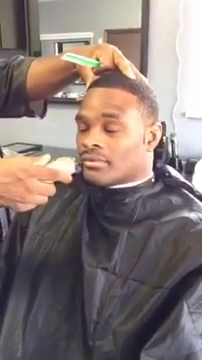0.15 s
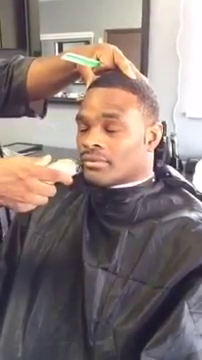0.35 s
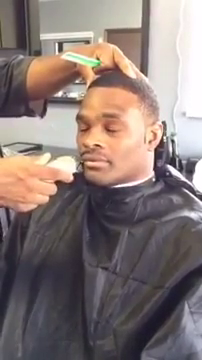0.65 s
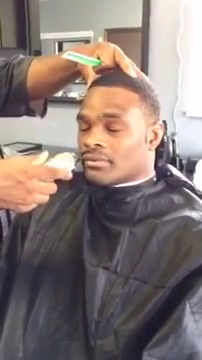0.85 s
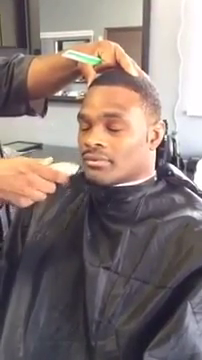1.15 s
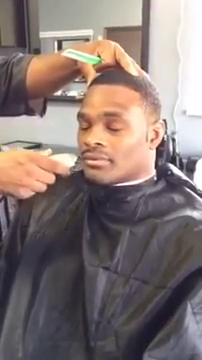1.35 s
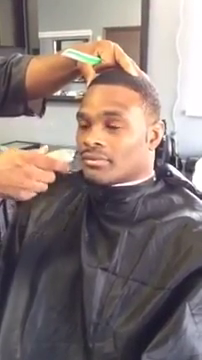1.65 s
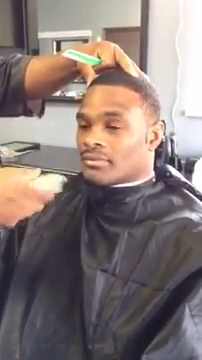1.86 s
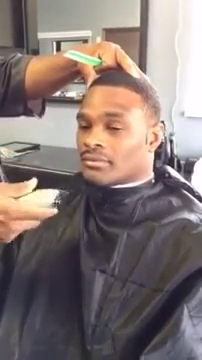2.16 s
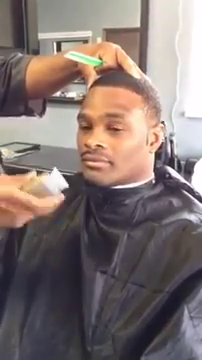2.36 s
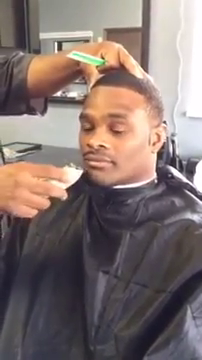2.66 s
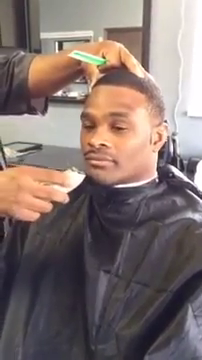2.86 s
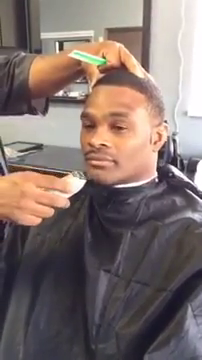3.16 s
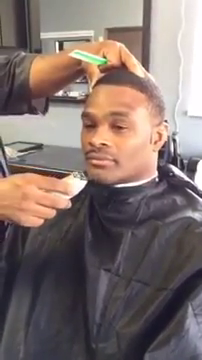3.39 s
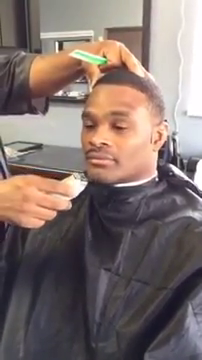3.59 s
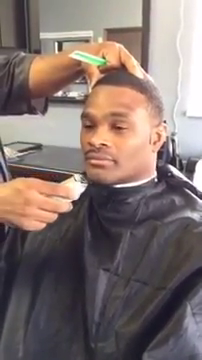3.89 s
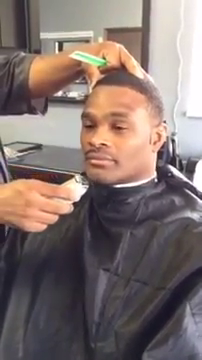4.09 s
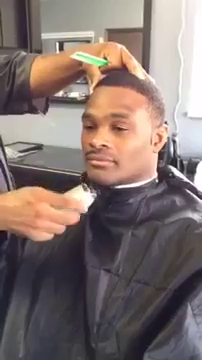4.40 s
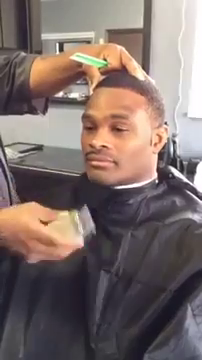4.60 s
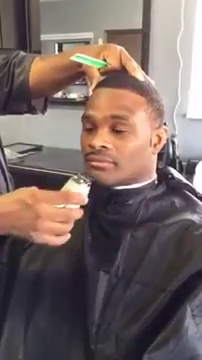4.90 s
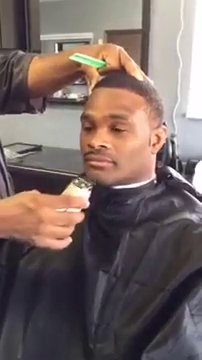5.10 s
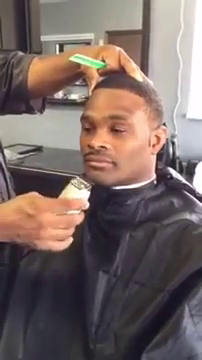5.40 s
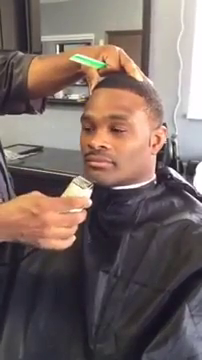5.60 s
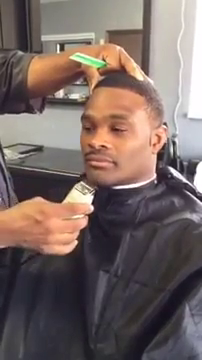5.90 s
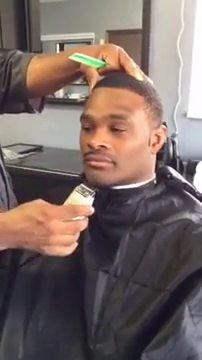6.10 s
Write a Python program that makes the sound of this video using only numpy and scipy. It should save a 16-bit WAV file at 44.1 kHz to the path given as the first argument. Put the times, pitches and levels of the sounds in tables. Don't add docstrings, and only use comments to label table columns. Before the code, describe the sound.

In a quiet barbershop with faint rumbling ventilation, mains-powered hair clippers buzz continuously for about 6.25 seconds, heard by a phone a few steps away with dull upper treble. The pitch stays fixed, a low hum under a nasal, rattling buzz and fine blade hiss, while tone and loudness shift as the hand turns. Soft crunching passes come around 0.2, 0.5, 0.8 and 1.3 to 1.7 seconds. At 1.77 a short rasp with a hard housing knock cleans the blades, followed by muffled bumps until 2.05. The buzz brightens; at 2.42 a lever snaps sharply, trailed by tiny ticks. Crunching resumes at 3.0 and thickens from 3.5, with raspy knocks at 3.85 and 4.27 and a strong crackle at 4.5. The buzz then carries on steadily, with crackling bites near 5.3 to 5.4 and crunching from 5.8 to 6.1, before a last knock at 6.2.

```python
import sys
import numpy as np
from scipy import signal
from scipy.fft import rfft, irfft
from scipy.io import wavfile
from scipy.ndimage import uniform_filter1d

SR = 44100
rng = np.random.default_rng(int(sys.argv[2]) if len(sys.argv) > 2 else 0)


def voltage_ratio(level):
    return 10 ** (np.asarray(level, float) / 20)


def bounce(signal):
    frames = np.transpose(np.atleast_2d(signal))
    limited = np.clip(frames, -1, 1)
    pcm = np.round(limited * 32767).astype(np.int16)
    wavfile.write(sys.argv[1], SR, pcm)


N = 275625
T = np.arange(N) / SR
SLOW = np.arange(N * 100 // SR + 2) / 100
MAINS_HZ = 59.98


def evened(x):
    return x / np.sqrt(np.mean(x ** 2) + 1e-20)


def add(mix, s, sound):
    part = mix[round(s * SR):][:len(sound)]
    part += sound[:len(part)]


def smoothed(x, bands, frames):
    return uniform_filter1d(uniform_filter1d(x, size=bands, axis=-2), size=frames, axis=-1)


def coloured(x, points):
    hz, db = np.transpose(points)
    f = np.fft.rfftfreq(len(x), 1 / SR)
    gain = voltage_ratio(np.interp(np.log(f + 1), np.log(hz), db))
    return evened(irfft(rfft(x) * gain, len(x)))


def body(x, peaks):
    out = np.zeros(len(x))
    for k, (hz, width, db) in enumerate(peaks):
        b, a = signal.iirpeak(hz, hz / width, SR)
        steep = signal.lfilter(b, a, signal.lfilter(b, a, x))
        out += (-1) ** k * voltage_ratio(db) * steep
    return evened(out)


def ring(modes, pitch):
    t = T[:SR // 10]
    out = np.zeros(len(t))
    for (hz, db, t60), (a, b) in zip(modes, rng.random((len(modes), 2))):
        mode_hz = hz * pitch * (0.967 + 0.058 * b)
        out += voltage_ratio(db + 2.1 * a - 60 * t / t60) * np.sin(2 * np.pi * mode_hz * t)
    out = out * np.minimum(t / 0.0003, 1)
    return out / abs(out).max()


def wander(size, hz):
    pole = np.exp(-2 * np.pi * hz / 100)
    rough = signal.lfilter([1], [1, -pole], rng.standard_normal((size, len(SLOW))))
    return evened(uniform_filter1d(rough, size=4))


def held(t, start, end, rise, fade):
    return np.minimum(rise * (t - start), 0) - fade * np.maximum(t - end, 0)


def strokes(count, sharp, uneven_db):
    turns = T * MAINS_HZ * count
    chance = np.clip(rng.standard_normal(int(turns[-1]) + 1), -3, 2)
    size = voltage_ratio(uneven_db * chance)
    return size[turns.astype(int)] * np.exp(-sharp * (turns % 1))


# (frequency [Hz], density [dB per Hz])
AIR_SPECTRUM = [(20, -40), (50, -17.5), (75, -16), (96, 3), (112, -6), (160, -14), (250, -18), (420, -28),
                (700, -24), (1000, -21), (1500, -34.5), (2500, -25), (5000, -42.5), (8500, -34.5)]


def air():
    swell_db = 0.8 * np.interp(T, SLOW, wander(size=1, hz=3)[0])
    return voltage_ratio(-51 + swell_db) * coloured(rng.standard_normal(N), AIR_SPECTRUM)


def room(x):
    level_db, t60_s, taps_per_s = -9, 0.62, 2000
    t = T[:SR // 2]
    taps = rng.choice([-1., 1.], len(t)) * (rng.random(len(t)) < taps_per_s / SR)
    taps = taps * voltage_ratio(-60 * t / t60_s) * (t > 0.004)
    taps = signal.lfilter([1], [1, -0.4], taps)
    return voltage_ratio(level_db) * signal.fftconvolve(x, taps / np.linalg.norm(taps))[:N]


# (time [s], level [dB], frequency [Hz])
THUMP_EVENTS = [
    (1.899, -39, 314),
    (1.948, -40, 130.6),
    (2.021, -41, 123.5),
    (4.941, -51, 377),
]


def thumps():
    out = np.zeros(N)
    for s, db, hz in THUMP_EVENTS:
        size = round(5 * SR / hz)
        add(out, s, voltage_ratio(db) * np.sin(2 * np.pi * hz * T[:size]) * np.hanning(size))
    return out


# (time [s], peak level [dB], pitch factor [1])
TICK_EVENTS = [
    (2.4236, -17, 0.94),
    (2.4949, -33.5, 0.99),
    (2.5363, -29.5, 0.94),
    (2.5463, -30, 0.73),
    (3.655, -29, 0.83),
]
# (delay [s], level [dB])
REBOUNDS = [
    (0, 1),
    (.0018, -7),
    (.0045, -15),
    (.008, -9),
    (0.012, -10),
]
# (frequency [Hz], level [dB], decay time T60 [s])
LEVER_MODES = [(3370, -6.5, 0.028), (3880, -14.5, 0.0033), (5000, 8, 0.0048), (5100, -11, 0.0089),
               (5840, 13, 0.0043), (6570, 6, 0.0083), (6960, 5.5, 0.0044), (7390, -1, 0.009),
               (7800, -21, 0.0038)]


def ticks():
    out = np.zeros(N)
    for s, db, pitch in TICK_EVENTS:
        for late, less_db in REBOUNDS:
            add(out, s + late, voltage_ratio(db + less_db) * ring(LEVER_MODES, pitch))
    return out


# (time of the knock [s], rasp level [dB], knock level [dB])
FLICK_EVENTS = [
    (1.765, -31, -17),
    (3.849, -31, -15.5),
    (4.272, -32, -16.5),
    (6.213, -30, -16),
]
# (delay [s], level [dB])
KNOCK_BLOWS = [
    (-.012, -6),
    (.0005, 0),
    (.005, -1.5),
    (0.011, -20),
]
# (frequency [Hz], density [dB per Hz])
RASP_SPECTRUM = [(120, -55), (200, -23.5), (438, -14.5), (505, -19), (712, 0.5), (901, -8.5), (2070, -1.5),
                 (2580, -8.5), (6820, -15.5), (8490, -22.5), (11000, -49.5), (18700, -120)]
# (frequency [Hz], level [dB], decay time T60 [s])
HOUSING_MODES = [(414, -33.5, 0.097), (781, -7.5, 0.12), (1226, 4.5, 0.081), (1556, 7, 0.04),
                 (2040, -8, 0.011), (3347, 10.5, 0.01), (4500, -11, 0.0068), (5790, 12.5, 0.0038),
                 (6700, -18, 0.0032)]


def flicks():
    out = np.zeros(N)
    grain_db = 2.8 * np.minimum(rng.exponential(1, N), 4)
    grit = coloured(rng.standard_normal(N) * voltage_ratio(grain_db), RASP_SPECTRUM)
    for s, rasp_db, knock_db in FLICK_EVENTS:
        slide = voltage_ratio(-5.5 + held(T - s, start=-0.028, end=0.059, rise=349, fade=231))
        jolt = voltage_ratio(1 + held(T - s, start=0, end=0.009, rise=6000, fade=500))
        out += voltage_ratio(rasp_db) * np.hypot(slide, jolt) * grit
        for late, db in KNOCK_BLOWS:
            add(out, s + late, voltage_ratio(knock_db + db) * ring(HOUSING_MODES, 1))
    return out


# (time [s], peak level [dB])
TUFT_EVENTS = [(0.5317, -31), (0.8387, -29.5), (1.4724, -27.5), (3.12, -34), (3.6122, -42), (3.641, -27),
               (3.654, -23.5), (3.7163, -30), (4.093, -23.5), (4.163, -29), (4.1863, -33), (4.4692, -39),
               (4.5128, -20), (5.286, -25), (5.3109, -25.5), (5.3852, -30), (5.396, -32), (5.412, -22),
               (5.419, -35.5), (5.9946, -31), (6.1117, -29)]
# (frequency [Hz], level [dB], decay time T60 [s])
PLATE_MODES = [(1300, -11, 0.013), (1620, -1, 0.03), (1736, 4.5, 0.033), (1874, -2.5, 0.02),
               (3320, -15.5, 0.0083), (6600, -25.5, .006)]


def tufts():
    out = np.zeros(N)
    bite = np.minimum(T[:SR // 10] / 0.002, 1)
    for s, db in TUFT_EVENTS:
        add(out, s, voltage_ratio(db + 3.0) * ring(PLATE_MODES, 1) * bite)
    return out


# (start [s], length [s], crunch level [dB], chatter over crunch [dB])
HAIR_PASSES = [(-.03, .1, -53.5, -17), (0.194, 0.16, -45.5, -15.5), (0.472, 0.1, -48, -16.5),
               (0.78, 0.13, -47.5, -16), (1.327, 0.36, -48, -15), (1.908, 0.13, -48, -15),
               (2.078, 0.42, -57, -4), (2.43, 0.13, -69, 2), (3.03, 0.35, -45, -10),
               (3.473, 0.11, -46.5, -5.5), (3.574, 0.18, -42.5, -10), (3.978, 0.29, -44, -6.5),
               (4.116, 0.36, -41, -6.5), (4.457, 0.12, -40.5, -4), (4.65, 0.13, -58.5, 4),
               (5.505, 0.39, -66.5, 5), (5.228, 0.17, -45.5, -8), (5.79, 0.2, -41.5, -13.5),
               (5.998, 0.095, -41, -15)]


def cutting(idle_db, bright):
    bite_s, leave_db_per_s = 0.036, 149.5
    power = voltage_ratio(2 * idle_db)
    for s, length, db, over_db in HAIR_PASSES:
        shape_db = held(T, s + bite_s, s + length, 20 / bite_s, leave_db_per_s)
        power = power + voltage_ratio(2 * (db + bright * over_db + shape_db))
    return np.sqrt(power)


# (frequency [Hz], width [Hz], level [dB])
CRUNCH_PEAKS = [(1258, 306, -11.5), (1600, 212, -2.5), (1897, 654, -8.5), (769, 227, -12), (3350, 520, -20),
                (6770, 540, -26)]


def crunch():
    snaps = rng.standard_normal(N) * (rng.random(N) < 9000 / SR)
    bunches = 0.2 + strokes(count=2, sharp=1.5, uneven_db=4.5)
    return cutting(idle_db=-62.5, bright=0) * body(snaps * bunches, CRUNCH_PEAKS)


# (frequency [Hz], width [Hz], level [dB])
CHATTER_PEAKS = [(2810, 460, -7), (3600, 980, 0), (4220, 780, -1.5), (5780, 3500, -7), (6950, 1500, 0),
                 (7960, 2700, -9)]


def chatter():
    puffs = 0.34 + strokes(count=4, sharp=2.1, uneven_db=1.5)
    drive = rng.standard_normal(N) * puffs
    return cutting(idle_db=-70, bright=0.88) * body(drive, CHATTER_PEAKS)


# (time [s], place, 0 cheek, 1 jaw, 2 under the jaw, 3 chin [1])
PLACE_PATH = [
    (0, 0),
    (1.65, -0.5),
    (2.1, 0.9),
    (2.55, 0.5),
    (3.0, 1),
    (3.12, 1.5),
    (4.55, 2.5),
    (4.85, 3),
    (6.25, 3),
]


def place_at(t):
    return np.interp(t, *np.transpose(PLACE_PATH))


# (frequency [Hz], width [Hz], level [dB])
TOOTH_PEAKS = [(2566, 470, 0.5), (3395, 670, -1.5), (3760, 570, -3), (4100, 830, -1.5), (5250, 880, -9.5),
               (6290, 690, -4), (7550, 1600, -8.5)]


def teeth():
    place = place_at(T)
    at = T * MAINS_HZ % 1 * (SR / MAINS_HZ)
    drive = np.zeros(N)
    for k, contacts in enumerate(rng.standard_normal((4, SR // 50))):
        share = np.sqrt(np.clip(1 - abs(place - k), 0, 1))
        drive += share * np.interp(at, range(len(contacts)), contacts)
    drive = drive * (0.1 + strokes(count=4, sharp=1.4, uneven_db=2.0))
    return voltage_ratio(-39.0) * cutting(idle_db=-70, bright=1) ** 0.32 * body(drive, TOOTH_PEAKS)


# (frequency [Hz], cheek [dB], jaw [dB], under the jaw [dB], chin [dB])
FACING_GAINS = [(2630, 0.18, 0, 8, -9), (2900, -1.1, 12, -4.5, -0.5), (3200, -0.52, 0.5, 8, -3.5),
                (3900, 0.35, 5.5, -5, 0.5), (4600, -1.3, 0, -2.5, 2), (5540, -2.4, -2.5, 2.5, -0.5),
                (6600, 2, 2, -11.5, 3.5), (7460, -1.2, -8.5, -4.5, -0.5)]


def facing(x):
    hz, t, z = signal.stft(x, SR, nperseg=512)
    place, rows = place_at(t), np.array(FACING_GAINS)
    by_time = np.array([np.interp(place, range(len(row)), row) for row in rows[:, 1:]])
    db = np.transpose([np.interp(hz, rows[:, 0], column) for column in by_time.T])
    patches = evened(smoothed(rng.standard_normal(z.shape), bands=3, frames=24))
    return signal.istft(z * voltage_ratio(db + 1.3 * patches), SR, nperseg=512)[1][:N]


MAINS_ORDERS = [2, 8, 10, 11, 12, 14, 16, 18, 19, 20, 22, 24, 25, 26, 27, 28, 29, 30, 31, 32, 33, 34, 35,
                36, 37, 38, 46, 55, 59, 61]
# (cheek [dB], jaw [dB], under the jaw [dB], chin [dB])
ORDER_LEVELS = [(-56, -61.5, -64, -59.5), (-83, -82, -77, -100.5), (-51, -53, -53.5, -56.5),
                (-57.5, -57.5, -58.5, -59.5), (-53, -50, -49.5, -47.5), (-60.5, -70.5, -63, -54),
                (-72, -60.5, -58, -70.5), (-60, -66.5, -61, -78.5), (-63.5, -75, -75, -70),
                (-62, -69.5, -68.5, -67.5), (-74, -57, -47.5, -56.5), (-70, -61, -51, -65.5),
                (-72, -60, -55, -62), (-52.5, -53.5, -42, -47), (-64, -57, -58, -60.5),
                (-57.5, -51, -49, -49), (-65, -51, -58.5, -57), (-60.5, -54.5, -60, -47.5),
                (-60.5, -62.5, -65.5, -70), (-62.5, -58, -50.5, -57.5), (-72, -69, -70, -78),
                (-62, -58.5, -54.5, -57.5), (-60.5, -58, -71, -62.5), (-74.5, -59.5, -58.5, -62),
                (-89.5, -85, -86, -57.5), (-68.5, -68, -62, -61), (-66.5, -71, -69, -79),
                (-72.5, -61, -64.5, -64.5), (-65, -61.5, -70.5, -67), (-71.5, -77.5, -63.5, -68)]
# (time [s], level [dB])
BUZZ_PATH = [(0, -45.5), (.75, -48.5), (1.3, -44), (1.7, -48.5), (1.9, -47.5), (2.12, -41), (2.48, -45.5),
             (2.65, -42.5), (3.3, -42), (3.5, -42), (3.95, -42.5), (4.18, -38.5), (4.38, -43),
             (4.52, -36.5), (4.77, -47), (4.88, -40), (5.6, -41), (6.25, -39.5)]


def motor():
    place, order = place_at(SLOW), np.array(MAINS_ORDERS)
    levels = np.array([np.interp(place, range(len(row)), row) for row in ORDER_LEVELS])
    gains = voltage_ratio(levels + 2.4 * wander(len(order), 5.4))
    buzz_db = np.interp(SLOW, *np.transpose(BUZZ_PATH))
    hum_db = -46.5 + 0.38 * (buzz_db - buzz_db.mean())
    hum, buzz = (order > 9) & (order < 16), (order > 21) & (order < 40)
    for group, db in (hum, hum_db), (buzz, buzz_db):
        gains[group] *= voltage_ratio(db) / np.sqrt((gains[group] ** 2).sum(0))
    turn = MAINS_HZ * T + 0.0031 * np.interp(T, SLOW, wander(1, 5.1)[0])
    sway = rng.random((len(order), 1)) + 0.036 * wander(len(order), 5.9)
    out = np.zeros(N)
    for k, gain, phase in zip(order, gains, sway):
        cycles = k * turn + np.interp(T, SLOW, phase)
        out += np.sqrt(2) * np.interp(T, SLOW, gain) * np.cos(2 * np.pi * cycles)
    return out


def scene():
    high_pass = signal.butter(2, 330, "high", fs=SR, output="sos")
    handling = signal.sosfilt(high_pass, flicks())
    sharp = crunch() + tufts() + handling + ticks() + thumps()
    blades = facing(teeth() + chatter())
    return (motor() + blades + sharp + room(sharp) + air())[None]


# (frequency [Hz], depth under the neighbours [dB])
MASKING_MARGIN = [(500, 18), (900, 12), (1800, 13), (2550, 6), (3300, 4.5), (4500, 3.2), (7600, 2.5),
                  (8300, -3)]


def thinned(x):
    window = np.sin(np.pi * (np.arange(2048) + 0.5) / 2048)
    hz, _, z = signal.stft(x, SR, window, 2048, 1024)
    size = abs(z)
    margin_db = np.interp(hz, *np.transpose(MASKING_MARGIN))
    masked = smoothed(size, bands=71, frames=3) * voltage_ratio(-margin_db)[:, None]
    whim = smoothed(rng.standard_normal(size.shape), bands=5, frames=3)
    masked = masked * voltage_ratio(1.8 * evened(whim))
    band = np.sqrt(abs(smoothed(size ** 2, bands=5, frames=3)))
    keep = (band > masked) & (size > voltage_ratio(-5) * masked)
    return signal.istft(z * np.where(keep, 1, 0.05), SR, window, 2048, 1024)[1][:, :N]


def roll_off(x):
    return signal.sosfilt(signal.butter(12, 8640, fs=SR, output="sos"), x)


def record(dry):
    edge = signal.firwin(201, 8300, window=("kaiser", 9), fs=SR)
    mix = thinned(signal.oaconvolve(dry, edge[None], "same"))
    return roll_off(mix)


dry = scene()
out = record(dry)
bounce(out)
```